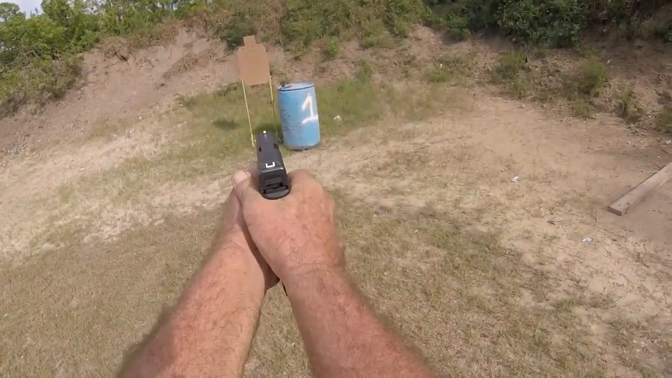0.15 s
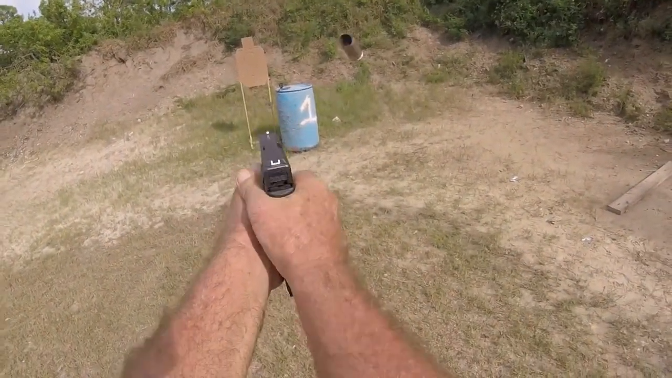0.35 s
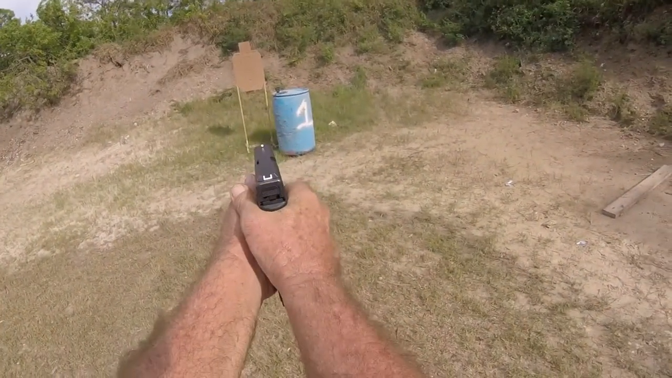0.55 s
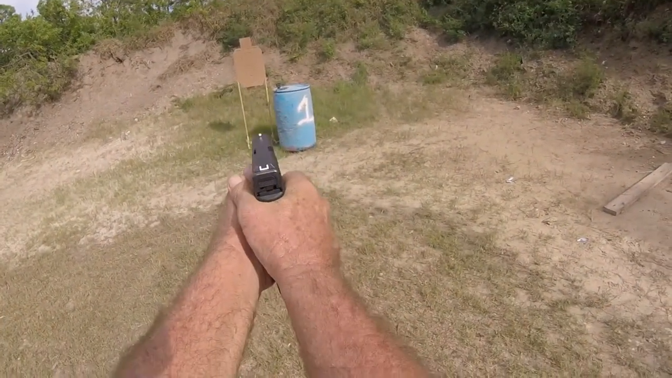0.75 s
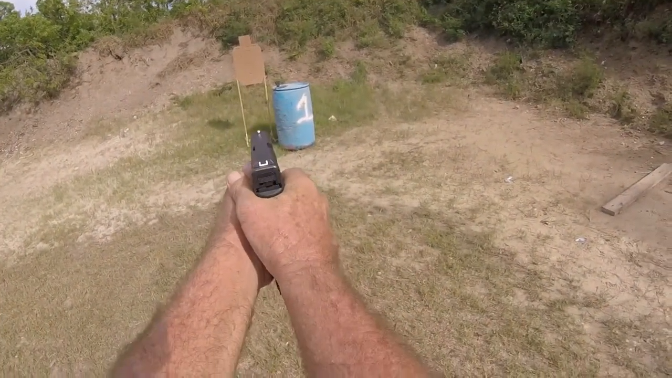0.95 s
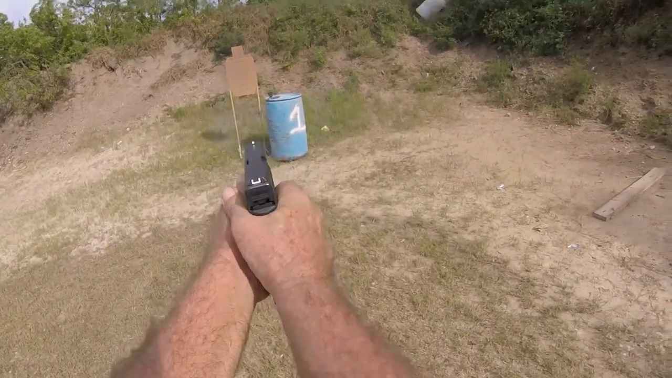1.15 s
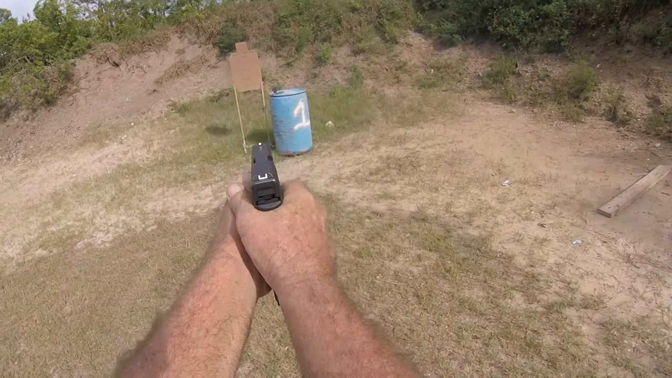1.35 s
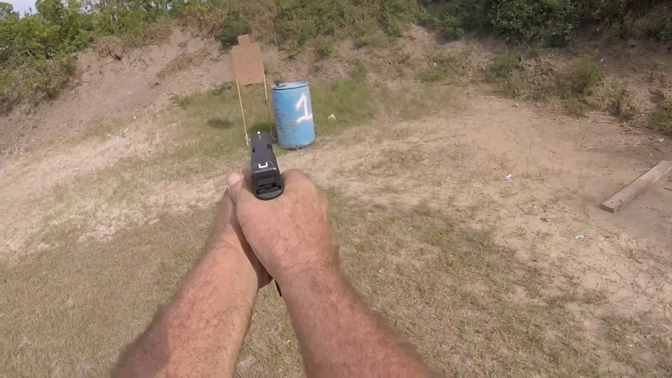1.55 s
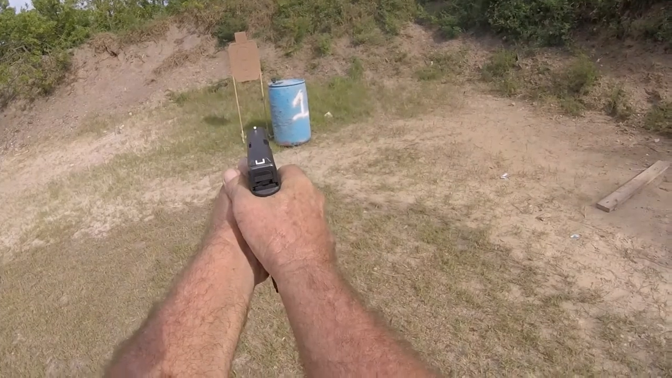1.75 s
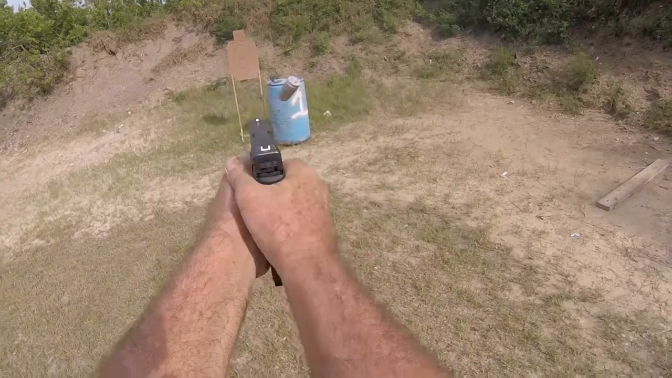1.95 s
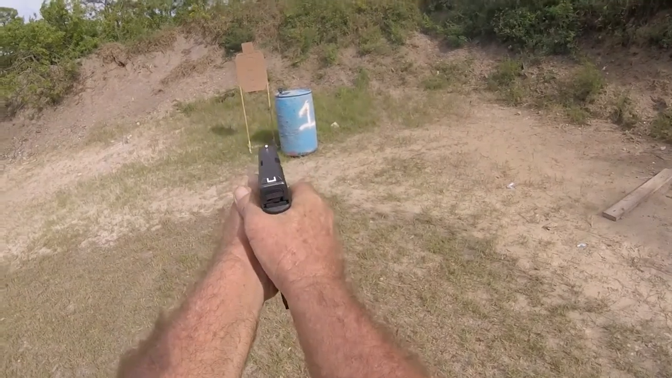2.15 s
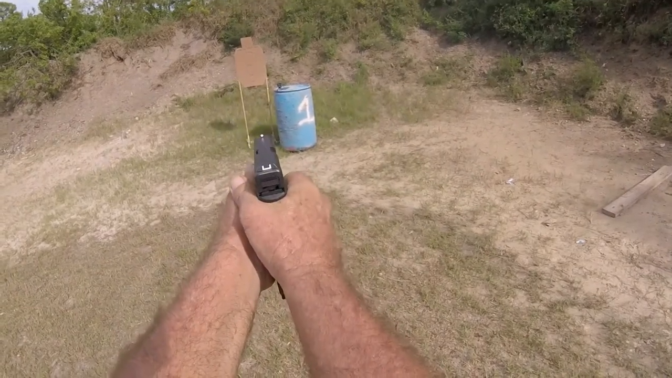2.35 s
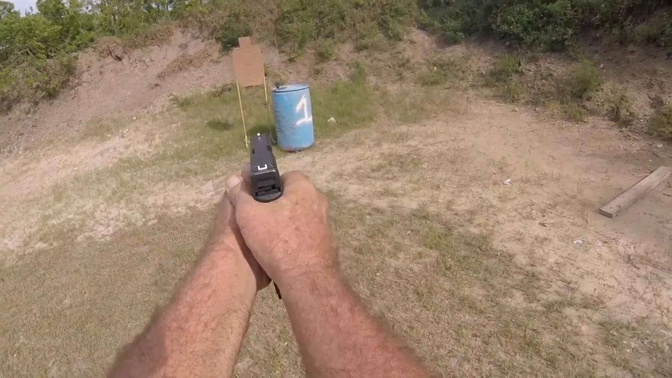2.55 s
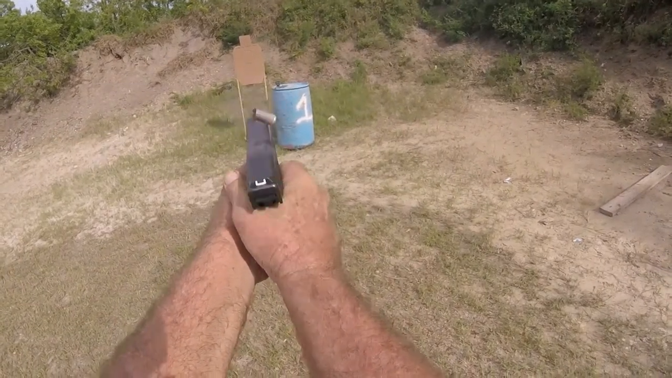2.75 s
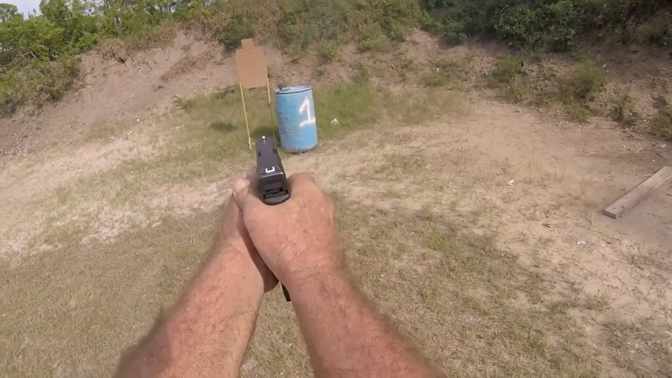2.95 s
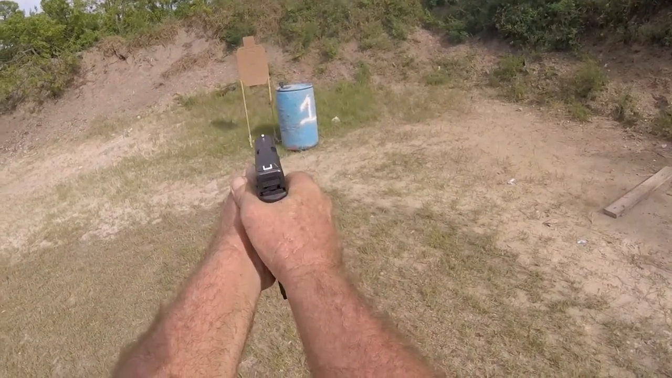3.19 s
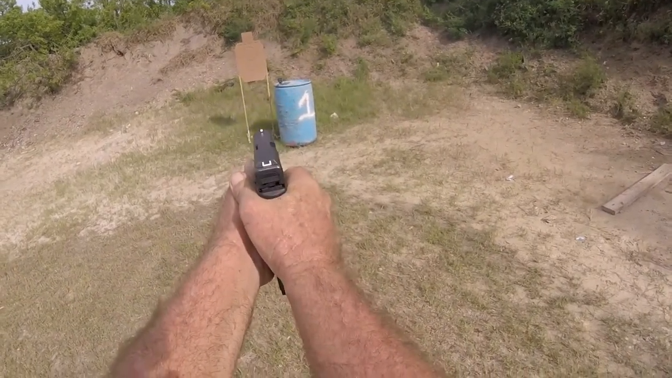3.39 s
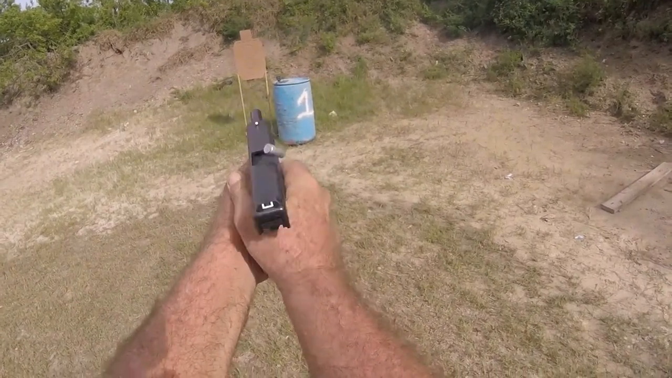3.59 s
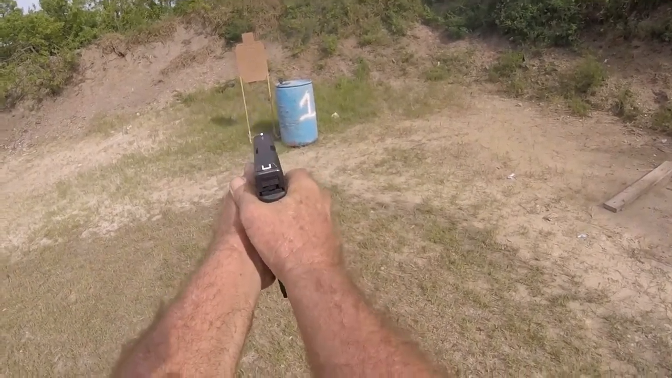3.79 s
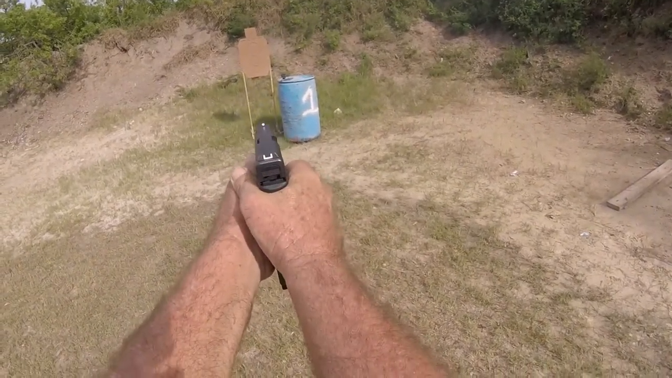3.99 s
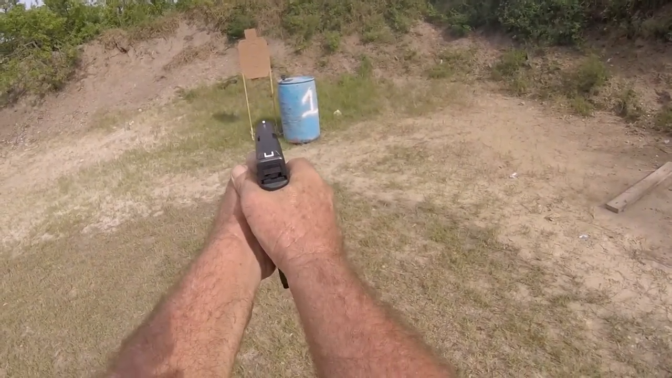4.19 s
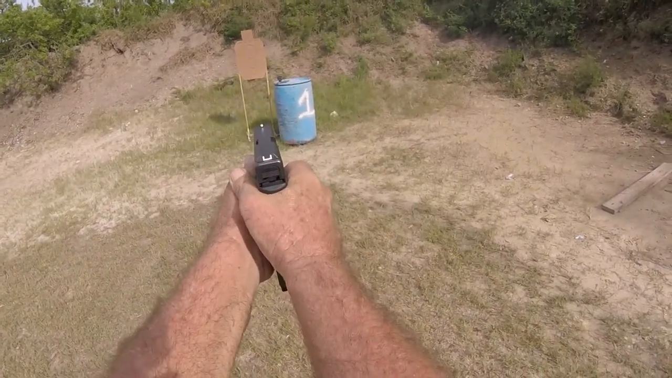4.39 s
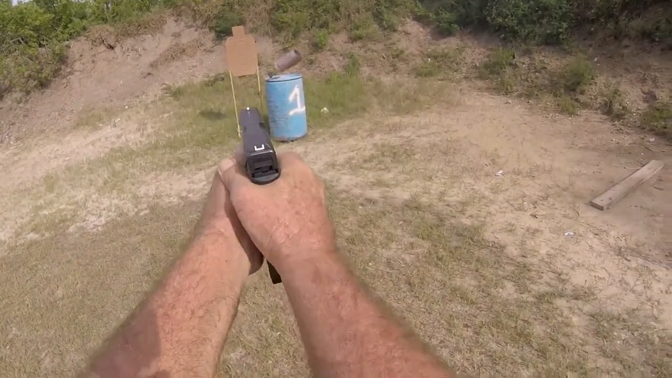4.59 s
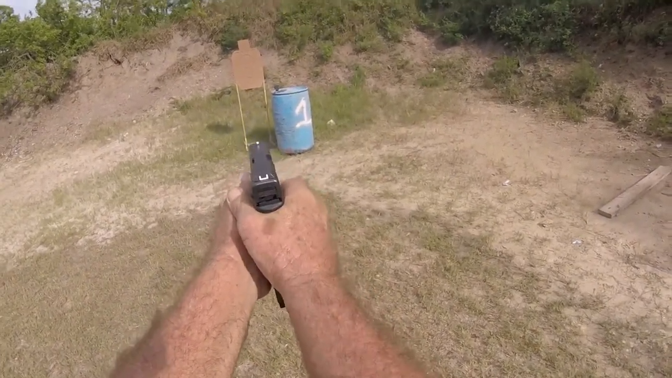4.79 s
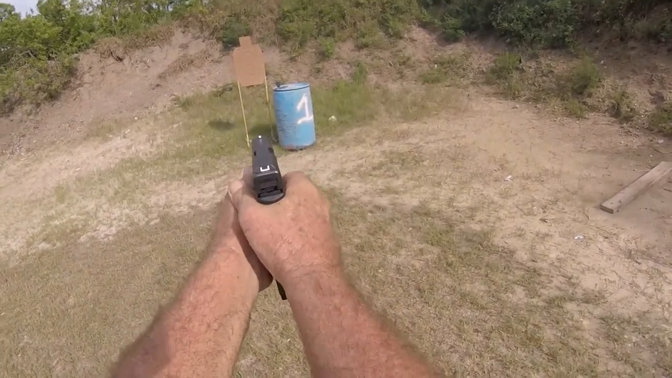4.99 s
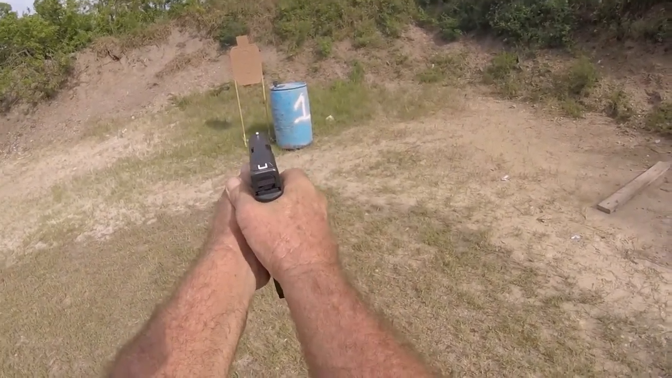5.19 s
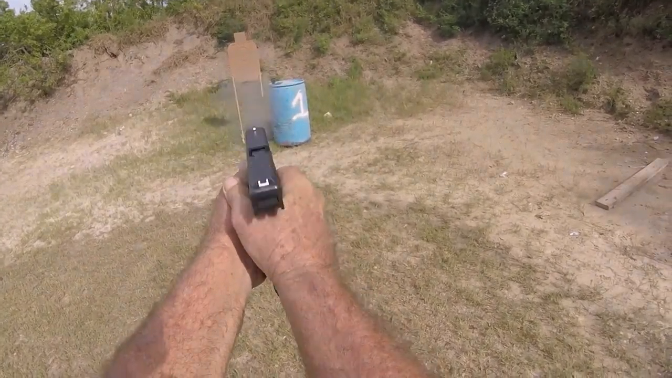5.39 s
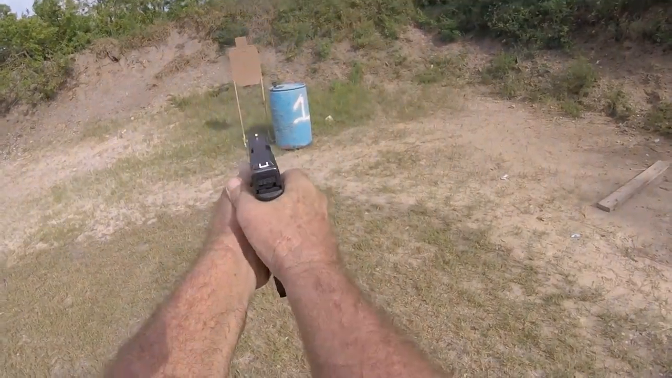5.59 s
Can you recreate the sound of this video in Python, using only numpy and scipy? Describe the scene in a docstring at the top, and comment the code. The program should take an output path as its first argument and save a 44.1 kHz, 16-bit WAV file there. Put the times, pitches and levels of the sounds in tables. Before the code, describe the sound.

Heard from a head-worn camera on an outdoor range, an earlier shot's echo dies under wind and hiss. Seven deliberate handgun shots follow, each a harsh clipped crack with a ground slap and rolling echoes. A small tick and dull thump from the spent case follows each of the first six shots.

```python
"""First come the dying echoes of an earlier shot over wind and faint hiss; seven handgun shots follow on an open range.
Each blast is a crack of noise on a push of air; it overdrives a small head-worn camera's microphone.
Pulses, short bursts and thinning noise bring it back from the ground, a drum, the target, earth banks and trees.
After each of the first six shots a spent case knocks the camera: a noise tick and a shove that creeps back.
The gain control looks ahead, so wind and echoes already sink just before each blast."""
import sys
import numpy as np
from scipy import signal
from scipy.io import wavfile

SR = 44100
rng = np.random.default_rng(int(sys.argv[2]) if len(sys.argv) > 2 else 0)


def inscribe(sig):
    """Save sig as 16-bit PCM at rate SR to the path in sys.argv[1].

    A 1-D sig is mono; a 2-D sig holds one channel per row.
    Samples are clipped to [-1, 1] before scaling.
    """
    pcm = np.round(np.clip(np.atleast_2d(sig).T, -1, 1) * 32767)
    wavfile.write(sys.argv[1], SR, pcm.astype(np.int16))


N = 248724

# far rustle and hiss, before its overall level: (frequency [Hz], band gain [dB])
AIR_COLOUR = [(150, -54.5), (250, -46.5), (450, -21), (850, -30), (2000, -38), (4200, -57), (8000, -51),
              (12500, -52)]
# strength of the wind, before its flutter: (time [s], level [dB])
WIND_LEVEL = [(0.0, -52.5), (0.3, -46.5), (0.6, -66), (0.83, -50.5), (1.068, -51), (1.398, -61),
              (1.55, -51.5), (1.931, -60.5), (2.25, -51), (3.05, -64.5), (3.63, -46.5), (3.9, -60.5),
              (4.2, -56.5), (4.5, -48), (4.9, -41.5), (5.03, -57), (5.269, -50.5), (5.448, -58.5)]
# balance of low and high in the wind: (frequency [Hz], relative band gain [dB])
WIND_COLOUR = [(8, -20), (20, 6.5), (50, 4.5), (85, -4), (130, -28.5), (250, -31), (500, -38)]
# spent cases hitting the camera: (time [s], shove level [dB], shove rise [ms], tick noise gain [dB])
CASE_KNOCKS = [(.5046, -9.5, 0.297, -16), (1.3142, -3, 0.228, -17), (2.1405, -6, 0.184, -20),
               (2.9715, -6, 0.189, -17), (3.8287, -10, 0.125, -16), (4.8273, -2.5, 0.16, -17.5)]
# shots, the first before the sound begins:
# (time [s], blast peak [dB], push gain before the blast is scaled to its peak [dB], ground bounce delay [ms])
SHOTS = [(-.5, 40, -3, 7.8), (0.352, 42.5, -6.5, 8.1), (1.1198, 41.5, -4, 7.95), (1.9844, 43, -3, 8.11),
         (2.816, 42, -6, 8), (3.6707, 42.5, -5, 8.1), (4.631, 42.5, 2, 7.97), (5.4888, 43.5, -5.5, 7.77)]
# sharp reflections off drum, target and a far post:
# (delay of pulse middle [ms], gain relative to the blast [dB], half the pulse length [ms])
SHARP_REFLECTIONS = [(29.2, -50, 3.8), (33.325, -25.5, 0.25), (35.48, -29.5, .35), (176, -66.5, .45)]
# bursts after every blast, in order: treble scattered by grass and gravel, hollow drum, slide slamming shut,
# dull near bank, far end of the bank, low rumble of the bank (starting just before its far end),
# middle tones from the trees:
# (delay [ms], gain relative to the blast [dB], centre [Hz], width of each of two resonances [Hz], fade time [ms])
BURSTS = [(10, -65.5, 9500, 4000, 48), (28.78, -35, 750, 500, 4.5), (48.5, -52.5, 5470, 1300, 9),
          (63.02, -44.5, 520, 586, 12.9), (85, -55.5, 615, 532, 13.2), (79.3, -54.5, 205.4, 125.3, 13.34),
          (342.2, -93.5, 2163, 1385, 147.4)]
# colour of the scattered echo, before fading and treble loss: (frequency [Hz], gain relative to the blast [dB])
SCATTER_COLOUR = [(100, -37.5), (230, -43), (360, -31.5), (550, -28.5), (900, -28.5), (2300, -34),
                  (5000, -37.5), (8000, -63), (14000, -62.5)]
# surfaces that lift the scattered echo, in order: drum and target, near banks, a farther bank, the tree line:
# (delay [s], lift [dB], rise [s], fall [s])
ECHO_SWELLS = [(.037, 10.5, 0.0146, 0.019), (.09, 11.5, 0.035, 0.1146), (.245, 6, 0.0054, .03),
               (0.411, 6, 0.098, 0.188)]

# scattered echo: it starts after the ground bounce and fades with the logarithm of the delay
SCATTER_START_S, SCATTER_LENGTH_S = 0.010729, 1
SCATTER_START_DB, SCATTER_DB_PER_DECADE = 0.5, 33.5
PORT_HZ, PORT_WIDTH_HZ, PORT_BOOST_DB = 6500, 380, 11.5  # resonance of the microphone port alone
BLOCK_S, BLOCK_START_S = .032, .0151  # time blocks of the gain control
CEILING_DB, RECOVERY_S = 0, .15
CUTOFF_HZ = 16000  # from here up the last filter holds everything 70 dB down


def amp(db):
    """Turns decibels into a factor."""
    return 10 ** (np.asarray(db) / 20)


def add(out, sound, start_s):
    """Mixes a sound in at a time, cutting off what falls outside."""
    at = round(start_s * SR)
    part = sound[max(-at, 0):max(len(out) - at, 0)]
    first = max(at, 0)
    out[first:first + len(part)] += part


def low(x, hz, order=2):
    """Low-pass: weakens what lies above a frequency."""
    return signal.sosfilt(signal.butter(order, np.clip(hz, 10, .45 * SR), fs=SR, output="sos"), x)


def resonance(x, hz, width_hz):
    """Lets one frequency through at full strength and weakens its surroundings, as a ringing body does."""
    r = np.exp(-np.pi * width_hz / SR)
    top = [(1 - r * r) / 2, 0, (r * r - 1) / 2]
    return signal.lfilter(top, [1, -2 * r * np.cos(2 * np.pi * hz / SR), r * r], x)


def drift(rate_hz):
    """Slow random wandering with a spread (standard deviation) of 1."""
    r = np.exp(-2 * np.pi * rate_hz / SR)
    noise = rng.standard_normal(N + SR)
    slow = signal.lfilter([1], [1, -2 * r, r * r], noise)[SR:]  # the first second settles the filter
    return slow / slow.std()


def coloured(white, colour, tilt=0):
    """Colours noise in half-octave bands, taken in turn from two noises; tilt [dB per octave] may change in time."""
    hz, db = np.transpose(colour)
    out = 0
    edges = hz[0] * 2 ** np.arange(0, np.log2(hz[-1] / hz[0]), .5)
    for k, edge in enumerate(edges):
        band_filter = signal.butter(2, [edge, edge * np.sqrt(2)], "band", fs=SR, output="sos")
        band = signal.sosfilt(band_filter, white[k % 2])
        centre = edge * 2 ** .25
        band_db = np.interp(np.log(centre), np.log(hz), db)
        out = out + band * amp(band_db + tilt * np.log2(centre / 700))  # the tilt pivots at 700 Hz
    return out


def far_air():
    """Far rustle and hiss: steady coloured noise whose level wavers slightly."""
    return coloured(rng.standard_normal((2, N)), AIR_COLOUR) * amp(-20 + 0.27 * drift(2.7))


def wind():
    """Wind presses on the microphone port in lumps: mostly deep noise with a fluttering level."""
    time_s, level_db = np.transpose(WIND_LEVEL)
    gusts = coloured(rng.standard_normal((2, N + SR)), WIND_COLOUR)[SR:]
    strength_db = np.interp(np.arange(N) / SR, time_s, level_db) + 2.5 * drift(14)
    return gusts / gusts.std() * amp(strength_db)


def case_knocks():
    """Each spent case ticks and shoves the microphone's diaphragm at once; the diaphragm creeps back."""
    out = np.zeros(N)
    ms = np.arange(SR // 4) * 1000 / SR
    for time_s, shove_db, rise_ms, tick_db in CASE_KNOCKS:
        tick = amp(tick_db) * low(rng.standard_normal(len(ms)), 5560) * np.exp(-ms / 2.06)
        shove = amp(shove_db) * np.clip(ms / rise_ms, 0, 1) * np.exp(-ms / 18)
        add(out, shove + tick, time_s)
    return out


def scatter_db(delay_s):
    """Level of the scattered echo: a fall with the log of the delay, lifted for a while by large surfaces."""
    spread = np.maximum(delay_s, SCATTER_START_S) / SCATTER_START_S
    db = SCATTER_START_DB - SCATTER_DB_PER_DECADE * np.log10(spread)
    for middle_s, lift_db, rise_s, fall_s in ECHO_SWELLS:
        side_s = np.where(delay_s < middle_s, rise_s, fall_s)
        db = db + lift_db * np.exp(-((delay_s - middle_s) / side_s) ** 2)
    return db


def echo_burst(white, hz, width_hz, fade_ms):
    """Noise through the same resonance twice, swelling fast and dying away."""
    u = np.arange(len(white)) * 1000 / SR / fade_ms
    sound = resonance(resonance(white, hz, width_hz), hz, width_hz)
    return sound / sound.std() * np.clip(3.5 * u, 0, 1) * np.exp(-u ** 1.1)


def reflected_pulse(half_ms):
    """A reflected blast: a dip, a jump up, a fall back; the longer the pulse, the softer its jump."""
    u = np.linspace(-1, 1, max(round(2 * half_ms * SR / 1000), 4))
    pulse = np.where(u < 0, -1.4, 1) * (1 - abs(u)) ** 0.4
    return low(np.pad(pulse, (0, 200)), 2600 / half_ms)


def blast(push_db, bounce_ms, size=SR // 4):
    """A ragged crack on a push that sags, then the ground bounce: a small peak and a deep pull; overall peak 1."""
    ms = np.arange(size) * 1000 / SR
    ragged = rng.standard_normal(size) * np.exp(-(ms / 1.7) ** 2)
    crack = amp(0.5) * low(ragged, 8100)
    crack = crack + amp(-5) * resonance(ragged, 3200, 1200) - amp(9) * resonance(ragged, 1800, 800)
    rattle = amp(-16.5) * low(rng.standard_normal(size), 5700) * np.exp(-ms / 4.7)
    sag = 1.1 * np.exp(-ms / 2.5) + .4 * np.exp(-ms / 30)
    push = np.clip((ms - .3) / 1.2, 0, 1) * sag
    # ground bounce, timed from its own arrival
    after = ms - bounce_ms
    pull_fade = .7 * np.exp(-np.maximum(after - .55, 0) / .55) + .36 * np.exp(-after / 22)
    pull = np.clip((after - .12) / .4, 0, 1) * pull_fade
    peak = amp(-8) * np.exp(-(after / .11) ** 2)
    grit = amp(-18) * low(rng.standard_normal(size), 6000) * np.exp(-abs(after - .3) / .45)
    whole = crack + rattle + amp(push_db) * push + peak + grit - amp(-2.5) * pull
    return whole / abs(whole).max()


def shots():
    """The range answers each blast in nearly the same way; leaves and air change a share of the echo."""
    delay_s = np.arange(SCATTER_LENGTH_S * SR) / SR
    shape = amp(scatter_db(delay_s)) * (delay_s > SCATTER_START_S)
    tilt = -.3 - 6 * delay_s ** 0.79  # dB per octave: longer paths through air lose more treble
    shared = rng.standard_normal((2, len(delay_s)))
    out = np.zeros(N)
    for time_s, peak_db, push_db, bounce_ms in SHOTS:
        white = .8 * shared + .6 * rng.standard_normal(shared.shape)
        add(out, amp(peak_db) * shape * coloured(white, SCATTER_COLOUR, tilt), time_s)
        add(out, amp(peak_db) * blast(push_db, bounce_ms), time_s)
        for delay_ms, gain_below_db, half_ms in SHARP_REFLECTIONS:
            level_db = peak_db + gain_below_db + rng.normal(0, 1)
            add(out, amp(level_db) * reflected_pulse(half_ms), time_s + (delay_ms - half_ms) / 1000)
        for k, (delay_ms, gain_below_db, hz, width_hz, fade_ms) in enumerate(BURSTS):
            burst = echo_burst(white[k % 2, -SR // 3:], hz, width_hz, fade_ms)
            add(out, amp(peak_db + gain_below_db) * burst, time_s + delay_ms / 1000)
    return out


def scene():
    """All sources added up as air pressure at the microphone."""
    return (far_air() + wind() + case_knocks() + shots())[None]


def gain_db(x):
    """Cuts enough for the loudest peak up to the end of the next block; the cut in dB then dies away."""
    over_db = np.maximum(20 * np.log10(abs(x) + 1e-9) - CEILING_DB, 1e-6)
    time_s = np.arange(N) / SR
    block = np.floor((time_s - BLOCK_START_S) / BLOCK_S).astype(int) + 1
    starts = np.flatnonzero(np.diff(block, prepend=-1))
    block_peaks = np.maximum.reduceat(over_db, starts)
    next_block = np.append(block_peaks[1:], 0)[block]
    # loudest peak still to come in the present block
    parts = np.split(over_db, starts[1:])
    rest = np.concatenate([np.maximum.accumulate(part[::-1])[::-1] for part in parts])
    # in logarithms, an exponential recovery is a straight line
    log_cut = np.log(np.maximum(rest, next_block))
    fade = time_s / RECOVERY_S
    return -np.exp(np.maximum.accumulate(log_cut + fade) - fade)


def record(dry):
    """The camera: ringing port, dulled top, gain control, weakened lows, clipping and a treble cut-off."""
    x = dry[0] + (amp(PORT_BOOST_DB) - 1) * resonance(dry[0], PORT_HZ, PORT_WIDTH_HZ)
    x = low(low(x, 8500), 18000, order=5)
    x = x * amp(gain_db(x))
    for hz in (38, 12):
        x = signal.lfilter(*signal.butter(1, hz, "high", fs=SR), x)
    x = np.clip(x, -.95, .95)
    return signal.sosfilt(signal.cheby2(12, 70, CUTOFF_HZ, fs=SR, output="sos"), x)[None]


dry = scene()
out = record(dry)
inscribe(out)
```